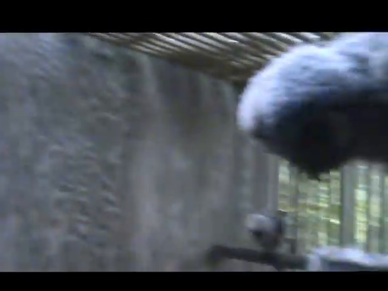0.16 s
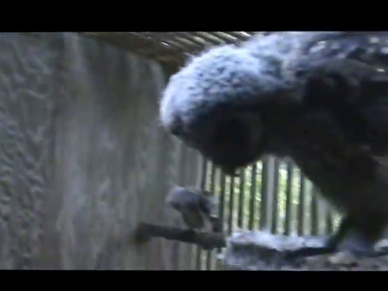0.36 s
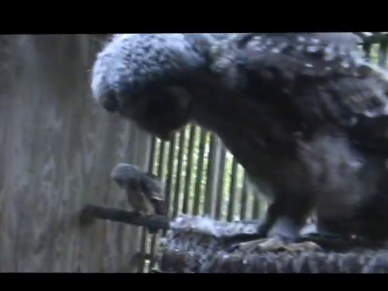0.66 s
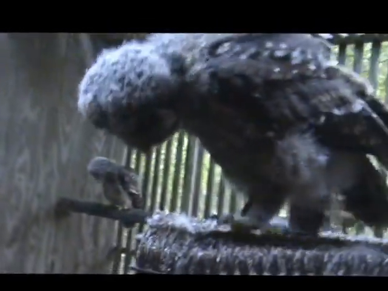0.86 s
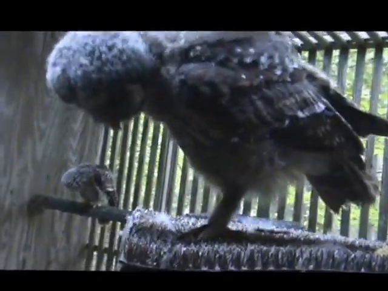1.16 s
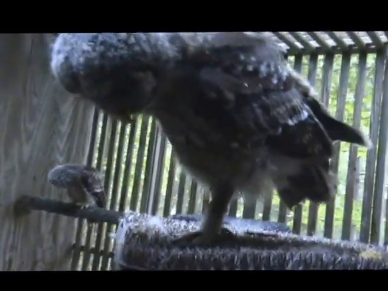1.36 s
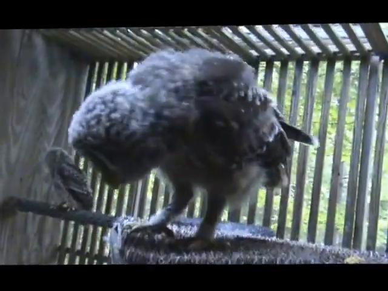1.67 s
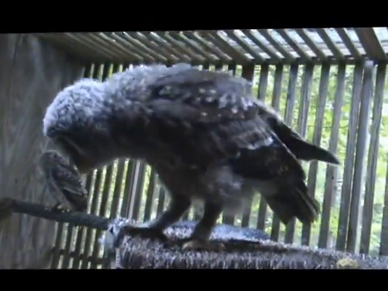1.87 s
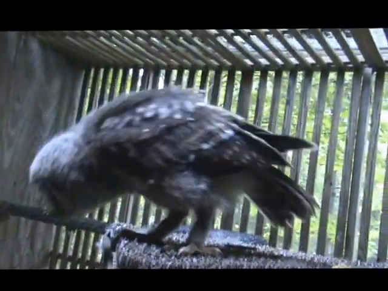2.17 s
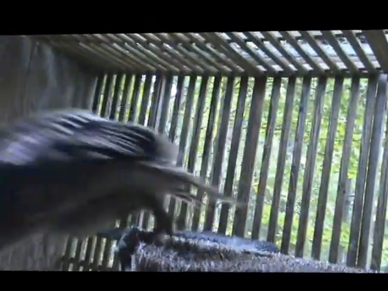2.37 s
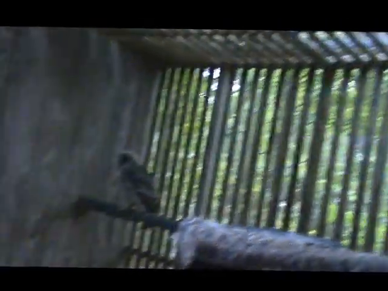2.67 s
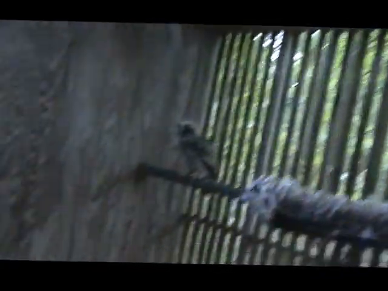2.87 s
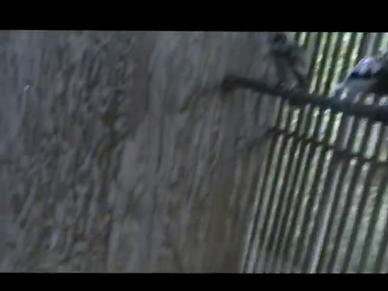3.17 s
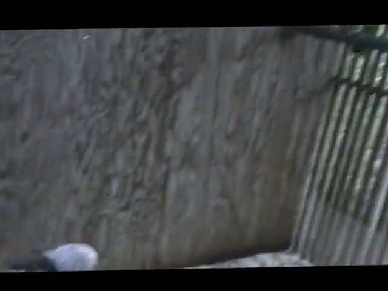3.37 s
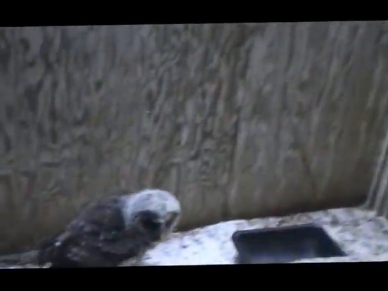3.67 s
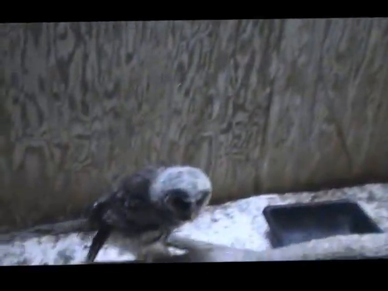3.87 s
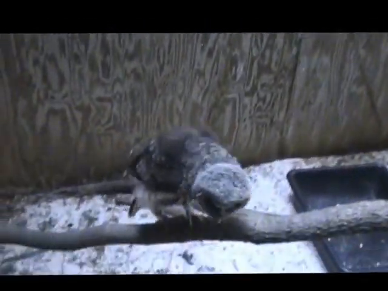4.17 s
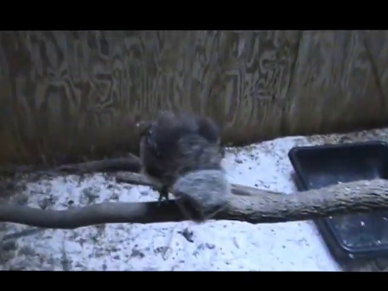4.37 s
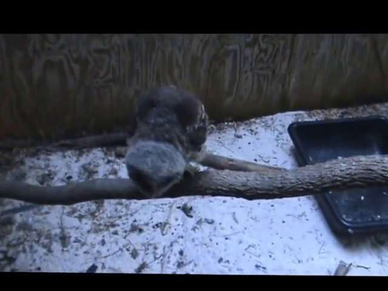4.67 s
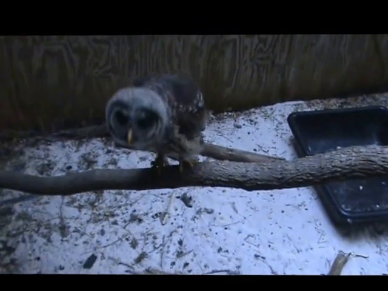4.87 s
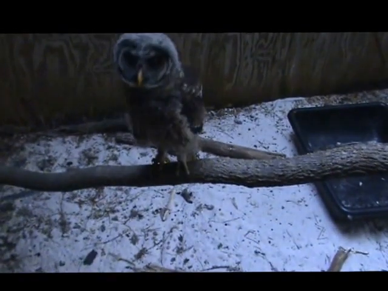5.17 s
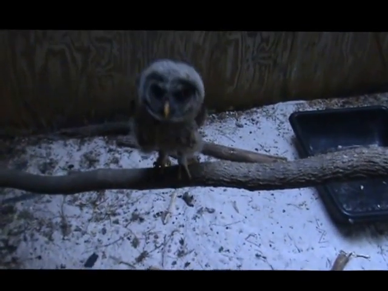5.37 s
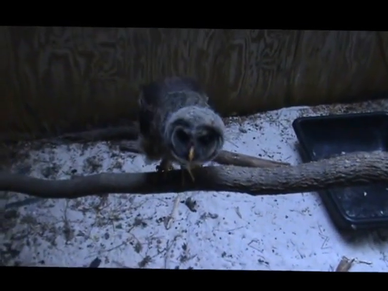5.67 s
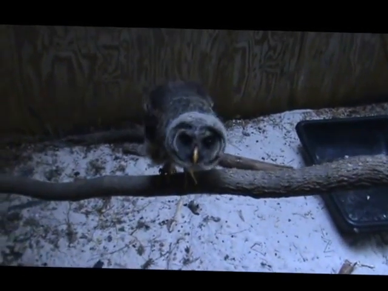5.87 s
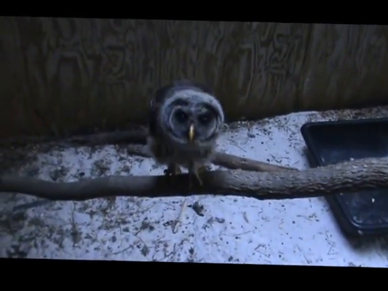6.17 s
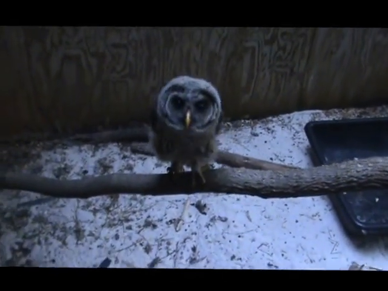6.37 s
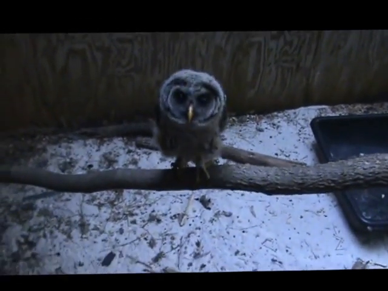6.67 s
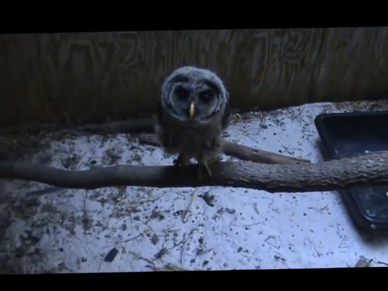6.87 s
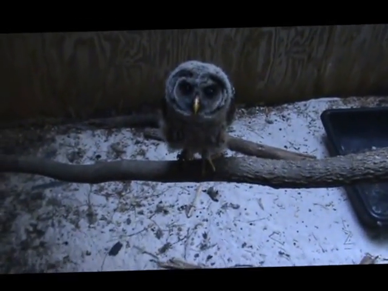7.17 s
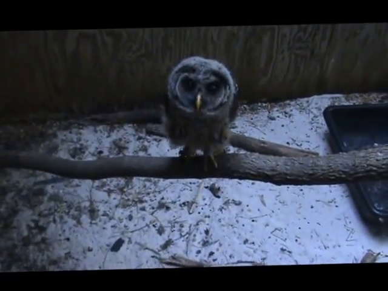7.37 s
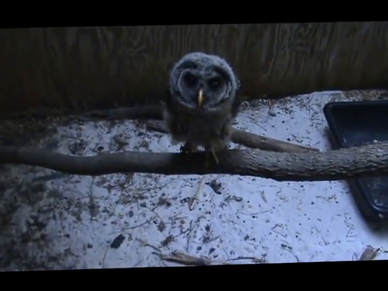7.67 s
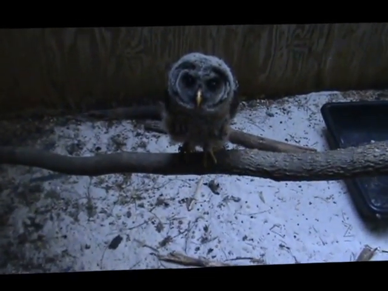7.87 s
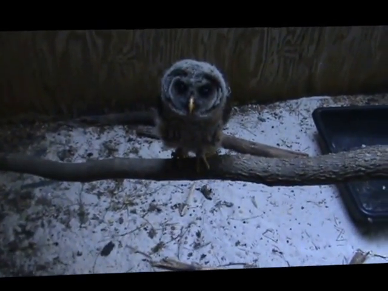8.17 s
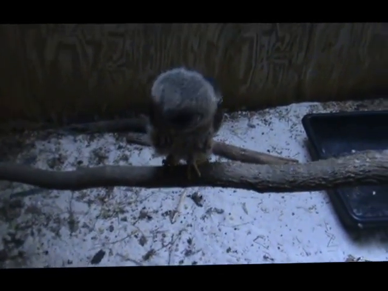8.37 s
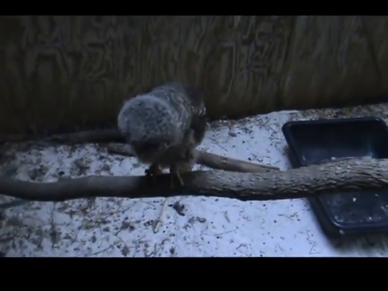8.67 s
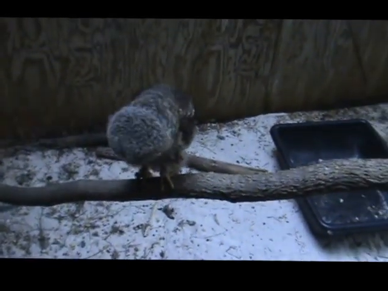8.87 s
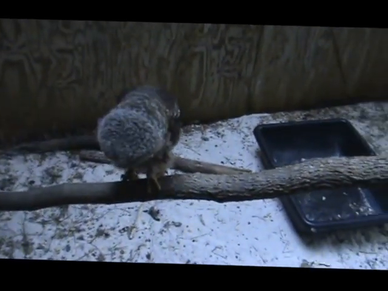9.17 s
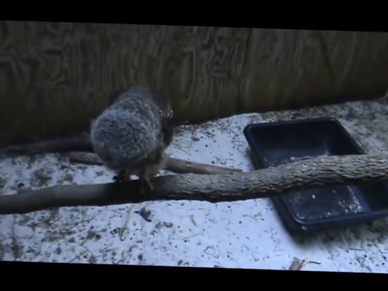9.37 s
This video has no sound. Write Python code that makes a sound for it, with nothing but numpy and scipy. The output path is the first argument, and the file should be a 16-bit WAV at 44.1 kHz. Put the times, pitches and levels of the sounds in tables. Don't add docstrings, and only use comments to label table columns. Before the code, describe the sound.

Close, hissing begging screeches from several owlets, with wooden knocks and feather rustles between calls, over faint woodland birdsong and soft outdoor murmur.

```python
import sys
import numpy as np
from scipy import signal
from scipy.fft import rfft, irfft
from scipy.io import wavfile
from scipy.ndimage import uniform_filter1d, minimum_filter1d, map_coordinates

SR = 44100
rng = np.random.default_rng(int(sys.argv[2]) if len(sys.argv) > 2 else 0)


def dump_mix(stems):
    frames = np.atleast_2d(stems).T
    limited = np.clip(frames, -1, 1)
    pcm = np.round(limited * 32767).astype(np.int16)
    wavfile.write(sys.argv[1], SR, pcm)


def invert_db(level):
    return 10 ** (np.asarray(level, dtype=float) / 20)


N = 419391


def unit(x):
    return x / np.sqrt(np.mean(np.abs(x) ** 2) + 1e-20)


def along(points, x):
    f, v = np.transpose(points)
    return np.interp(np.log(x + 0.0013), np.log(f), v)


def wobble(rate, size):
    knots = rng.standard_normal(int(size * rate / SR) + 4)
    return map_coordinates(knots, [np.arange(size) * rate / SR])


def patches(shape, across, along_time):
    field = uniform_filter1d(rng.standard_normal(shape), across, 0)
    return unit(uniform_filter1d(field, along_time, 1))


def shaped(gain_db, size, channels):
    hz, t, z = signal.stft(rng.standard_normal((channels, size)), SR, nperseg=384)
    return signal.istft(z * invert_db(gain_db(hz[:, None], t)), SR, nperseg=384)[1][:, :size]


def echoes(x, walls, wide, longest):
    out, step = np.zeros((2, N + 2 * SR)), SR // 3
    for i in range(0, N, step // 2):
        part = x[i:i + step]
        part = part * np.hanning(step)[:len(part)]
        tail = shaped(lambda hz, t: -60 * t / along(walls, hz), size=round(longest * SR), channels=2)
        wet = signal.fftconvolve(part[None], tail / np.linalg.norm(tail[0]), axes=1)
        out[:, i + 200:i + 200 + wet.shape[1]] += wet
    mid, side = out[:, :N]
    return mid + wide * np.array([[1], [-1]]) * side


def outdoors():
    # start_s, murmur_db, rumble_db
    air = [(0.0, -39, -55.5), (5.72, -39.5, -52.5), (6.52, -46, -53.5), (9.51, -41.5, -60.5)]
    # start_s, pitch_hz, level_db
    motor = [
        (6.9, 115.0, -67.5),
        (7.23, 132.9, -50),
        (9.51, 137, -52),
    ]
    # frequency_hz, level_db (per Hz)
    murmur = [(59, -12.5), (100, -6), (457, -5), (682, -3.5), (825, 0.5), (2180, -9.5), (3390, -10),
              (4470, -13), (5180, -12), (15500, -26)]
    # frequency_hz, level_db (per Hz)
    rumble = [(20, -28.5), (40, -12.5), (100, -1), (200, -7.5), (300, -32.5)]
    # frequency_hz, likeness (0-1)
    alike = [(60, 1), (240, 0.83), (950, 0.65), (3770, 0.49), (15000, 0.57)]
    t = np.arange(N) / SR
    hz = np.fft.rfftfreq(N, 1 / SR)
    angle = np.arccos(np.clip(along(alike, hz), -.998, .998)) / 2
    mid_side = np.array([np.cos(angle), np.sin(angle)])

    def patchy(hz, at):
        treble = 5 * np.exp(-((hz - 2600) / 700) ** 4 - ((at - 4.3) / 0.86) ** 4)
        middle = 5 * np.exp(-((hz - 400) / 170) ** 2 - ((at - 4.8) / 1.3) ** 4)
        late = 6.8 * np.exp(-((hz - 330) / 200) ** 2 - ((at - 7.6) / 0.75) ** 4)
        streaks = 2.7 * patches((len(hz), len(at)), across=2, along_time=30) * (hz < 6000)
        return treble + middle + late + streaks

    s, murmur_db, rumble_db = np.transpose(air)
    out = 0
    for spectrum, db, rate in ((murmur, murmur_db + 0.5, 3), (rumble, rumble_db, 6)):
        noise = rfft(shaped(patchy, size=N, channels=2))
        mid, side = irfft(noise * invert_db(along(spectrum, hz)) * mid_side, N)
        level = invert_db(np.interp(t, s, db) + .8 * wobble(rate, N))
        out = out + level * unit(np.array([mid + side, mid - side]))
    s, hum_hz, hum_db = np.transpose(motor)
    phase = 2 * np.pi * np.cumsum(np.interp(t, s, hum_hz)) / SR
    return out + invert_db(np.interp(t, s, hum_db, left=-90) + 3.5) * np.sin(phase)


def songbirds():
    # after_s, length_s, from_hz, to_hz, level_db
    phrase = [
        (-.014, .028, 2600, 2194, -4),
        (0.01, .135, 2224, 2448, 0.5),
        (0.2, 0.06, 2400, 2430, 3),
        (0.4, .19, 2180, 2440, 3),
    ]
    # start_s, level_db
    phrases = [
        (1.5, -38.5),
        (2.72, -37.5),
        (4.731, -40),
    ]
    # start_s, length_s, from_hz, to_hz, level_db
    hoot = (5.7, .2, 1960, 2095, -36)
    # start_s, end_hz, level_db
    far_chips = [(4.61, 3110, -44.5), (4.74, 3100, -55), (4.75, 2870, -51), (6.34, 3410, -52),
                 (6.38, 2890, -51), (6.42, 2410, -55.5), (6.5, 3950, -64), (6.54, 3330, -54),
                 (6.73, 1830, -55), (6.77, 3220, -49), (6.85, 3180, -49), (6.91, 2313, -53),
                 (7.12, 3310, -53), (6.8, 3820, -55), (6.97, 1842, -50.5), (7.1, 3680, -53.5),
                 (7.3, 1781, -53), (7.42, 3670, -51.5), (7.48, 3150, -53.5), (7.66, 1692, -54),
                 (7.77, 3984, -49), (7.81, 3520, -54), (7.999, 1670, -53.5)]
    # start_s, length_s, from_hz, to_hz, level_db
    sweeps = [
        (3.882, 0.052, 9500, 7800, -45.5),
        (3.999, 0.33, 3140, 3085, -56.5),
        (4.046, 0.37, 4420, 4390, -61),
        (4.419, 0.054, 6640, 7960, -39),
        (4.56, 0.04, 3100, 3620, -46),
        (4.6, .035, 3100, 3500, -44),
        (6.816, 0.071, 2800, 2460, -55),
        (7.481, 0.05, 3400, 2190, -57),
        (7.486, 0.12, 9800, 7330, -53),
    ]
    # frequency_hz, t60_s
    trees = [(1500, 1), (9000, 0.32)]
    song = [(s + after, length, from_hz, to_hz, db + step_db)
            for s, db in phrases for after, length, from_hz, to_hz, step_db in phrase]
    chips = [(s, 0.0832, 1.02 * hz, hz, db) for s, hz, db in far_chips]
    near, far = np.zeros(N), np.zeros(N)
    for place, notes, waver_hz in ((near, song + [hoot], 18), (far, chips, 65), (far, sweeps, 18)):
        for s, length, from_hz, to_hz, db in notes:
            u = np.linspace(0, 1, round(length * SR))
            hz = to_hz + (from_hz - to_hz) * (1 - u) ** 2.3 + waver_hz * wobble(90, len(u))
            level = invert_db(db + 6.5 + 4.16 * wobble(59.6, len(u))) * np.sin(np.pi * u) ** 0.5 * (0.5 + u)
            place[round(s * SR):][:len(u)] += level * np.sin(2 * np.pi * np.cumsum(hz) / SR)
    return .75 * near + .2 * far + echoes(.38 * near + .9 * far, trees, wide=.5, longest=.5)


def knocks():
    # start_s, peak_db, body_hz, t60_s, click_db
    blows = [(1.505, -13, 1660, 0.013, -36.5), (2.404, -20.5, 150, 0.24, -38), (2.383, -27, 390, .02, -45),
             (2.391, -29, 380, .02, -45), (2.398, -21, 410, .025, -42), (2.931, -27, 800, .01, -38),
             (2.531, -31, 730, 0.025, -32), (1.39, -35.5, 100, 0.21, -58), (1.55, -30.5, 112, 0.22, -44),
             (2.8989, -9, 590, 0.0073, -23.5), (2.969, -11, 850, 0.012, -22), (2.978, -27, 1100, .015, -40),
             (2.38, -21.5, 1000, 0.046, -45), (2.813, -23.5, 753, .04, -45), (3.3, -27, 1000, .012, -49),
             (2.8, -30, 1500, .008, -36), (1.855, -32, 2500, .006, -32.5), (3.6, -27, 850, .09, -55),
             (3.3, -31, 900, .02, -50), (2.406, -12.5, 900, 0.017, -43), (5.992, -25, 310, 0.2, -35),
             (5.992, -29, 214, 0.082, -50), (6.278, -33, 220, .1, -55), (6.008, -15, 860, 0.022, -37),
             (6.28, -26, 410, 0.035, -33.5), (6.407, -24, 780, 0.095, -33)]
    out, t = np.zeros(N), np.arange(SR // 4) / SR
    for s, db, body_hz, t60, click_db in blows:
        sag_s = 0.0166 if body_hz < 190 else 0.008
        thump = np.sin(2 * np.pi * body_hz * (t + sag_s * (1 - np.exp(-t / 0.03))))

        def body_db(hz, at):
            octaves = np.log(hz / (0.88 * body_hz) + .01)
            return -10 * np.log10(1 + octaves ** 4) + 0 * at

        rattle = unit(shaped(body_db, size=len(t), channels=1)[0])
        padded = 1 - np.exp(-t / 0.00044)
        ring = invert_db(db - 60 * t / t60) * padded * (.7 * thump + .22 * rattle)
        dull = uniform_filter1d(uniform_filter1d(rng.standard_normal(len(t)), size=5), size=7)
        out[round(s * SR):][:len(t)] += ring + invert_db(click_db + 14.5 - 60 * t / 0.0067) * dull
    return signal.lfilter(*signal.butter(2, 90, 'high', fs=SR), out)


def rustles():
    # peak_s, rise_s, fall_s, level_db, brightness_db (per octave)
    puffs = [
        (2.43, .02, 0.06, -35.5, 0.5),
        (2.85, 0.043, 0.014, -30.5, -3),
        (3.015, 0.016, 0.04, -42, 2),
        (4.941, .002, 0.046, -34, 1.5),
        (6.82, .02, .03, -55, 6),
        (1.19, .003, .006, -44, 4),
        (6.41, .003, .02, -46, 0),
        (2.9, 0.059, 0.081, -35.5, -26),
    ]
    out, t = np.zeros(N), np.arange(SR // 4) / SR
    peak_s = .08
    for s, rise, fall, db, tilt_db in puffs:
        def feather_db(hz, at):
            tilt = tilt_db * np.log2(hz / 1500 + 0.13)
            return tilt - 14 * (hz < 120) - 12 * (hz / 10000) ** 2 + 0 * at

        hiss = unit(shaped(feather_db, size=len(t), channels=1)[0])
        swell = np.exp(-((t - peak_s) / np.where(t < peak_s, rise, fall)) ** 2)
        out[round((s - peak_s) * SR):][:len(t)] += invert_db(db + 2.5 * wobble(400, len(t))) * swell * hiss
    return out


def perch():
    return signal.lfilter(*signal.butter(2, 45, 'high', fs=SR), knocks() + rustles())


def catching():
    # start_s, burst_db
    catches = [(.049, 5.5), (.649, 4), (.939, 9), (1.052, 1), (2.037, 0), (2.108, 7), (2.325, 9),
               (3.222, 14), (3.243, 4), (3.262, 12), (3.363, 4), (3.414, 6), (3.473, 6), (3.537, -2),
               (3.599, 14), (5.088, -2), (5.157, 6), (5.55, 6), (5.806, 1), (5.883, 2), (6.106, 5),
               (6.263, 2), (8.185, 6), (8.204, 5), (8.487, 4), (8.52, 1), (9.114, 3), (9.38, 5), (9.43, 4)]
    half = SR // 20
    db, t = np.zeros(N), np.arange(-half, half) / SR
    fade = -0.94 * np.exp(np.minimum(t, 0) / .005)
    burst = np.exp(-np.maximum(t, 0) / 0.01)
    shape = np.where(t < 0, fade, burst)
    for s, burst_db in catches:
        at = round(s * SR) - half + np.arange(len(t))
        db[at[at >= 0]] += burst_db * shape[at >= 0]
    return invert_db(uniform_filter1d(db, size=45))


def breathing(curve, attack, scoop, swell, swell_db, split, widen, from_db, to_db):
    silent_db, speaks = -62.5, 0.45
    (s0, hz0, *db0), (s1, hz1, *_) = curve[0], curve[-1]
    begun = s0 > attack
    lead = [(s0 - attack, scoop * hz0, silent_db, silent_db),
            (s0 - (1 - speaks) * attack, (scoop + (1 - scoop) * speaks) * hz0, *db0)]
    release = [(s1 + .024, 0.76 * hz1, silent_db, silent_db)]
    s, hz, up_db, low_db = np.transpose((lead if begun else []) + curve + release)
    under = np.clip(np.log2(np.median(hz) / hz), 0, None)
    effort_db = np.maximum(up_db, low_db)
    breath_db = np.interp(s, [s0, s1], [from_db, to_db])
    breath_db = breath_db - 22.5 * under + 0.071 * (effort_db - np.median(effort_db))
    breath_db = breath_db - swell_db * np.clip(1 - (s - s0) / swell, 0, 1) * begun
    breath_db[effort_db <= silent_db] = silent_db
    low_hz = split * hz * 2 ** (-widen * under)
    return np.transpose([s, hz, up_db, low_hz, low_db, breath_db])


def breath_colour(t, up_hz, pipe_hz, mode_db, low_breath_db, high_breath_db, top_hz):
    # share (of the upper pitch), level_db
    skirt = [(.05, -45.5), (.12, -18), (.4, -13), (.47, -9.5), (.75, -2), (.95, -3), (1.04, -10.5),
             (1.12, -18.5), (1.4, -31), (1.66, -60.5)]
    # share (of the upper pitch), level_db
    shelf = [(.9, -17.5), (1.1, 10.5), (1.45, -2), (2.03, 3.5), (2.15, -39.5)]
    # start_s, from_hz, end_s, to_hz, depth
    breath_hollows = [
        (1.08, 11500, 1.795, 4800, 0.95),
        (9.18, 11300, 9.55, 5200, .85),
        (6.0, 4100, 6.4, 4060, 0.63),
        (6.0, 2700, 6.4, 2880, 0.5),
        (8.95, 2240, 9.4, 3200, .62),
    ]

    def colour(hz, at):
        now = at + t[0]
        share = hz / np.interp(now, t, up_hz)
        low = invert_db(along(skirt, share) + low_breath_db * np.clip(3 - 4 * share, 0, 1))
        body = low + invert_db(high_breath_db + along(shelf, share)) * (hz < top_hz)
        pipe = 1 / np.abs(1 - .6 * np.exp(2j * np.pi * hz / pipe_hz - hz / 12000))
        pipe = pipe * (1 + invert_db(mode_db) * np.exp(-((hz - 2 * pipe_hz) / 90) ** 2))
        for s0, from_hz, s1, to_hz, depth in breath_hollows:
            if s0 < t[-1] and s1 > t[0]:
                hollow = np.interp(now, [s0, s1], [from_hz, to_hz], left=-1e5, right=-1e5)
                body = body * (1 - min(depth, .95) * np.exp(-((hz - hollow) / 900) ** 2))
        return 20 * np.log10(body * pipe) + 2.5 * patches(share.shape, across=1, along_time=16)

    return colour


def screech(rows, catch, pipe_hz, side_db, glide_rough, held_rough, throat):
    # start_s, end_s, rate_per_s, depth_hz
    tremble = (1.33, 1.7, 10.3, 80)
    octave_db, waver_hz, flutter_db, *breath_throat = throat
    s, *cols = np.transpose(rows)
    first = round(s[0] * SR)
    t = np.arange(first, min(round(s[-1] * SR), N)) / SR
    up_hz, up_db, low_hz, low_db, breath_db = (np.interp(t, s, c) for c in cols)
    n = len(t)
    from_s, to_s, rate, tremble_hz = tremble
    tiring = (t > from_s) * (t < to_s)
    low_hz = low_hz + tremble_hz * np.sin(2 * np.pi * rate * (t - from_s)) * tiring
    breaks = np.clip(np.abs(np.gradient(up_hz)) * SR / 14500, 0, 1.5)
    roughness = held_rough + (glide_rough - held_rough) * np.minimum(breaks, 1)

    def shake():
        return waver_hz * (.6 * wobble(30, n) + 1.15 * wobble(300, n))

    shared_waver = shake()

    def reed(hz, db):
        rough = catch[first:][:n] * (1 + roughness * wobble(900, n))
        flutter = flutter_db * (wobble(59.78, n) - breaks * np.abs(wobble(70, n)))
        phase = 2 * np.pi * np.cumsum(hz + shared_waver + 0.391 * shake()) / SR
        return np.sqrt(2) * rough * invert_db(db + flutter) * np.exp(1j * phase)

    up, low = reed(up_hz, up_db), reed(low_hz, low_db)
    scale = (np.abs(up) + np.abs(low) + 1e-9) / np.sqrt(2)
    octave = invert_db(octave_db - np.clip(up_hz - 6400, 0, 900) / 85) * (up + low) ** 2 / scale
    above, below = up ** 2 * np.conj(low), low ** 2 * np.conj(up)
    sides = invert_db(side_db) * (invert_db(-8) * above + below) / scale ** 2
    colour = breath_colour(t, up_hz, pipe_hz, *breath_throat)
    rasp = invert_db(breath_db + 10.5 + 0.3 * wobble(250, n)) * shaped(colour, size=n, channels=1)[0]
    return (up + low + octave + sides).real + rasp


def owlets():
    # start_s, upper_hz, upper_db, lower_db (halves of the syrinx)
    riser = [
        [(0.0, 7920, -31, -20.5), (.2, 8200, -34, -26), (.3, 8830, -32, -24.5), (.36, 9170, -32, -18.5),
         (.405, 9220, -31, -18), (.44, 9560, -34, -22), (.503, 9790, -44, -23.5), (.53, 8900, -50, -21),
         (.565, 7500, -50, -14)],
        [(5.05, 8080, -29, -45), (5.13, 7200, -14.5, -45), (5.22, 7440, -12, -32), (5.45, 8120, -24.5, -51),
         (5.48, 8000, -18, -46), (5.8, 8840, -24, -62), (5.965, 9540, -36.5, -36), (6.03, 8160, -25.5, -17),
         (6.065, 6520, -18, -16)],
    ]
    thin = [
        [(.856, 6160, -33.5, -46), (.88, 6300, -31, -35), (1.0, 6150, -33, -29), (1.2, 6026, -33, -29.5),
         (1.36, 5950, -46, -34.5), (1.66, 5970, -67, -42.5), (1.735, 5600, -56, -44), (1.775, 4930, -62, -40),
         (1.8, 3710, -62, -32)],
        [(8.6, 6520, -25, -30), (8.7, 6340, -21, -27), (8.78, 6030, -20, -27), (8.9, 5895, -23, -27),
         (9.15, 5705, -32.5, -29.5), (9.25, 5910, -34, -37.5), (9.35, 5800, -49, -30.5), (9.51, 5405, -63, -38)],
    ]
    hoarse = [
        [(0.0, 6740, -12.5, -34), (.05, 7030, -14.5, -26), (.2, 7090, -30.5, -23.5), (.33, 7450, -24, -39),
         (.42, 7300, -21, -44), (.53, 7550, -24, -34), (.61, 7400, -24, -43), (.7, 6120, -11.5, -10.5),
         (.73, 5640, -28, -28)],
        [(5.63, 7340, -22, -35), (5.7, 7240, -21, -14.5), (5.78, 7630, -11.5, -25), (5.935, 6940, -15.5, -15),
         (5.985, 7950, -23, -18), (6.13, 7070, -22, -20.5), (6.26, 7080, -21, -13.5), (6.31, 7300, -11.5, -18),
         (6.345, 5550, -21, -22)],
        [(8.154, 6200, -17.5, -18), (8.17, 7065, -14, -24), (8.25, 7000, -15, -12), (8.55, 7215, -23, -14),
         (8.75, 7005, -19, -8), (8.81, 7860, -26, -31), (8.865, 7390, -22, -7.5), (8.9, 5950, -13, -13),
         (8.925, 4750, -29, -28)],
    ]
    shy = [
        [(1.757, 7600, -35, -55), (1.84, 7160, -35, -41), (1.95, 6890, -29, -26.5), (2.05, 6890, -29, -26),
         (2.16, 7210, -26, -21), (2.265, 7450, -24, -19.5), (2.3, 6940, -30, -16), (2.35, 6130, -25, -15),
         (2.38, 5150, -36, -24.5)],
        [(3.09, 7400, -50, -58), (3.15, 6890, -41, -44), (3.2, 6490, -35, -28.5), (3.27, 6400, -28, -28.5),
         (3.31, 6900, -30, -27.5), (3.43, 6660, -26.5, -25.5), (3.5, 6920, -28, -25), (3.57, 7220, -24.5, -15),
         (3.647, 5400, -24, -19)],
    ]
    shrill = [
        [(4.955, 7200, -37, -40), (4.99, 7350, -36, -40), (5.035, 6540, -37.5, -43), (5.14, 6450, -33, -26),
         (5.36, 6490, -31, -26), (5.46, 6900, -43, -27.5), (5.53, 6880, -38, -29), (5.56, 6173, -42, -7),
         (5.605, 5300, -40, -27)],
        [(.53, 7600, -55, -60), (.541, 7300, -17, -60), (.55, 6900, -8.5, -60), (.565, 6150, -15, -60),
         (.585, 5560, -15, -60)],
    ]
    # left_right_db, split (lower over upper pitch),
    # widen (parting under the usual pitch), breath_start_db, breath_end_db
    call_set = [(2.5, .94, .02, -69, -50), (2, 0.94, 0.29, -26.5, -43), (6, .915, .3, -43.5, -37.5),
                (5.5, .925, 0.33, -35, -42), (2.5, 1, .3, -20, -20), (0.8, 0.92, .3, -18, -23.5),
                (-1.1, 0.95, .3, -21, -21), (-0.5, .928, .3, -31.5, -20.5), (-1, .93, .3, -38, -26),
                (-1.5, 0.93, .3, -47, -28), (0, .93, .3, -48, -44)]
    # octave_db, waver_hz, flutter_db, second_pipe_mode_db, low_breath_db,
    # high_breath_db, high_breath_top_hz
    throats = [(-56, 21.4, 1.5, -20, 2.5, -29, 10500), (-19, 18, 3, -23.5, 0, -8, 13300),
               (-39.5, 60, 3.5, -5, -5, -33, 11700), (-32, 39.1, 3.5, -31, -0.2, -36, 12000),
               (-25, 55, 4, -25, 8.5, -15, 14000)]
    # attack_s, scoop (first pitch over the held one), breath_swell_s, swell_db
    onsets = [(.02, .89, .05, 6.5), (.03, .62, 0.06, 4.5), (.022, .62, 0.022, 6.5), (.04, .55, 0.062, 22),
              (.022, .64, .15, 4)]
    first_pipes = [1000, 893, 959, 845, 813]
    later_pipes = [1040, 1083, 1041, 857, 800]
    side_levels = [-25, -13, -6.5, -18, -16]
    glide_roughs = [.05, .3, .55, .3, .1]
    held_roughs = [.12, .1, .1, .15, .5]
    out, settings, catch = np.zeros((2, N)), iter(call_set), catching()
    birds = zip((riser, thin, hoarse, shy, shrill), throats, onsets, first_pipes, later_pipes,
                side_levels, glide_roughs, held_roughs)
    for calls, throat, onset, first_hz, later_hz, side_db, glide_rough, held_rough in birds:
        for k, curve in enumerate(calls):
            pan_db, *breath = next(settings)
            rows = breathing(curve, *onset, *breath)
            pipe_hz = later_hz if k else first_hz
            call = screech(rows, catch, pipe_hz, side_db, glide_rough, held_rough, throat)
            sides = invert_db([[pan_db / 2], [-pan_db / 2]])
            out[:, round(rows[0][0] * SR):][:, :len(call)] += call * sides
    return out


def scene():
    # frequency_hz, t60_s
    planks = [(300, 0.13), (3000, 0.18), (9000, 0.16)]
    near = owlets() + perch() * invert_db([[-.8], [.8]])
    room = echoes(near.mean(axis=0), planks, wide=0.49, longest=1 / 5)
    return near + invert_db(-3.0) * room + (songbirds() + outdoors()) * invert_db([[-.4], [.4]])


def starved(x):
    # frequency_hz, depth_db
    mask = [(7000, 57), (9000, 49), (11000, 43.5), (14000, 38), (14700, 44)]
    hz, _, z = signal.stft(x, SR, nperseg=512)
    power = uniform_filter1d(np.mean(np.abs(z) ** 2, axis=0), size=3, axis=1)
    bands = np.add.reduceat(power, np.arange(0, len(hz), 4))
    scatter_db = 6.5 * patches(bands.shape, across=1, along_time=18)
    floor_db = scatter_db - along(mask, hz[::4] + 1)[:, None]
    keep = bands > bands.max(axis=0) * invert_db(floor_db) ** 2
    keep = np.repeat(keep, 4, axis=0)[:len(hz)] | (hz < 7000)[:, None]
    return signal.istft(z * keep, SR, nperseg=512)[1][:, :N]


def band_limit(x):
    return signal.sosfilt(signal.butter(12, 15660, fs=SR, output="sos"), x)


def record(dry):
    need = np.minimum(1, .97 / (np.abs(dry).max(axis=0) + 1e-9))
    gain = uniform_filter1d(minimum_filter1d(need, size=301), size=301)
    mix = starved(dry * gain)
    return band_limit(mix)


dry = scene()
out = record(dry)
dump_mix(out)
```